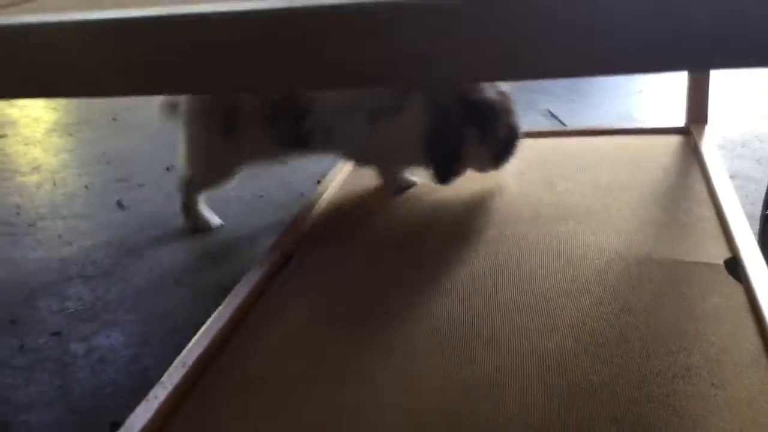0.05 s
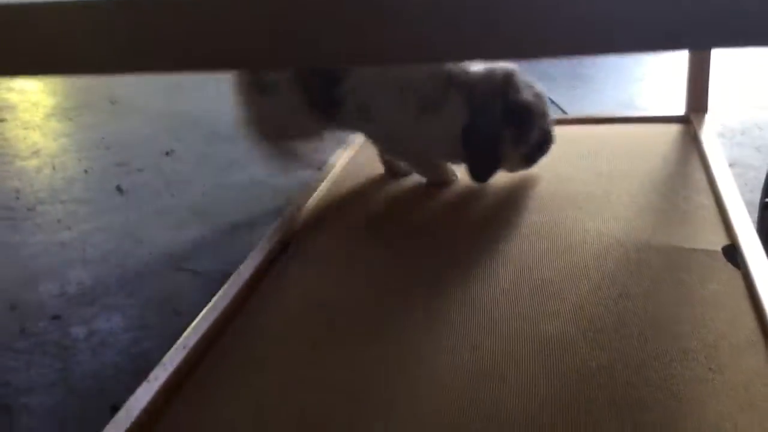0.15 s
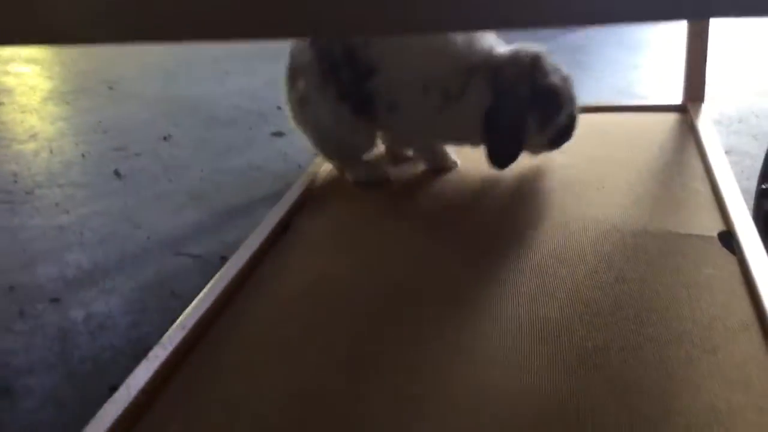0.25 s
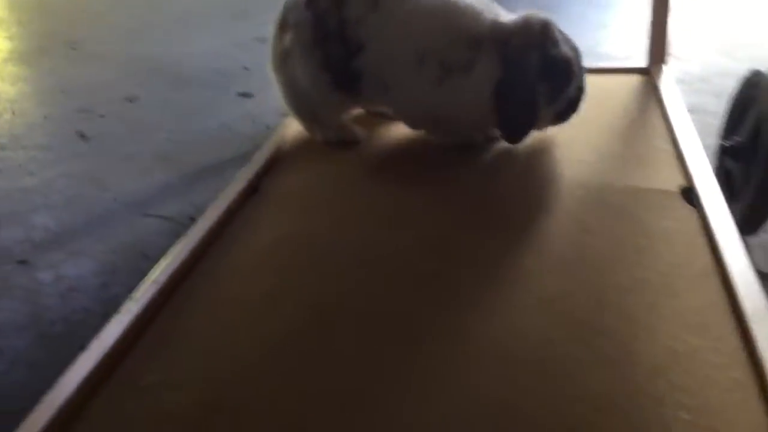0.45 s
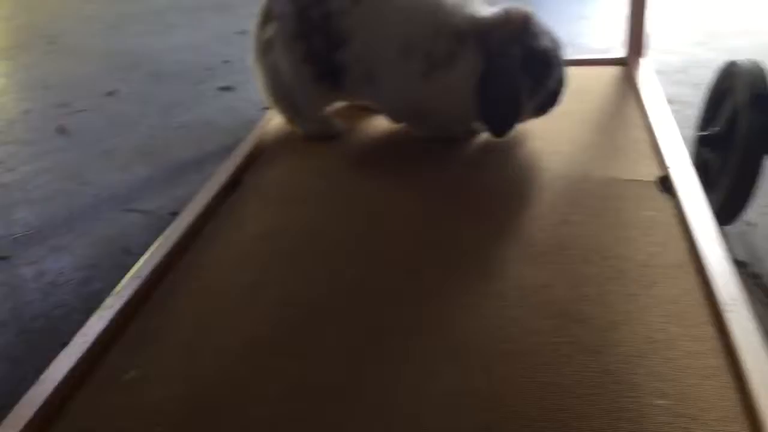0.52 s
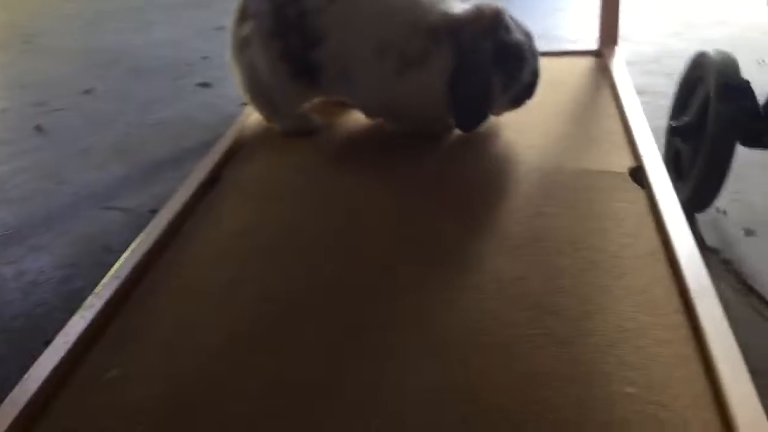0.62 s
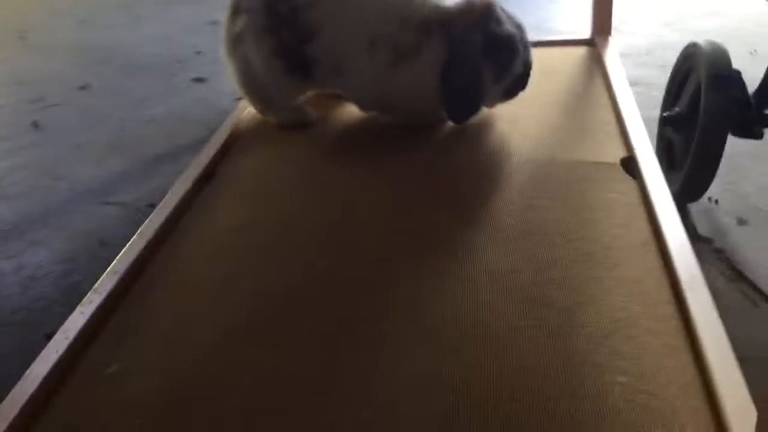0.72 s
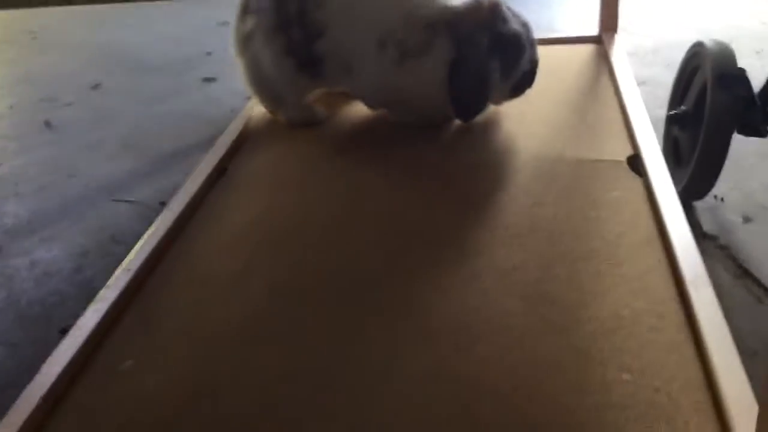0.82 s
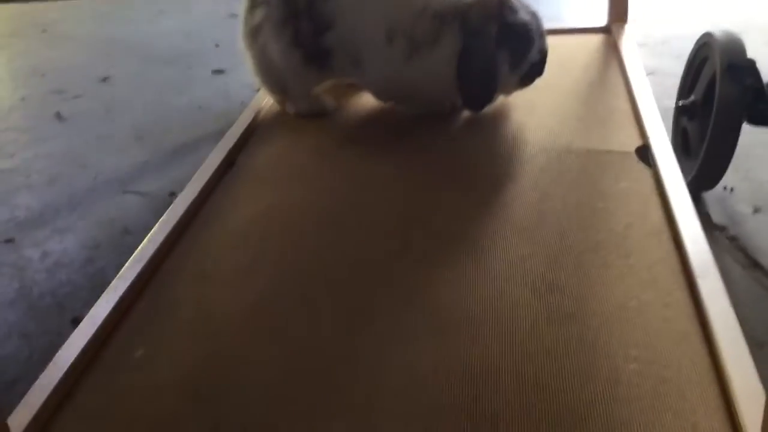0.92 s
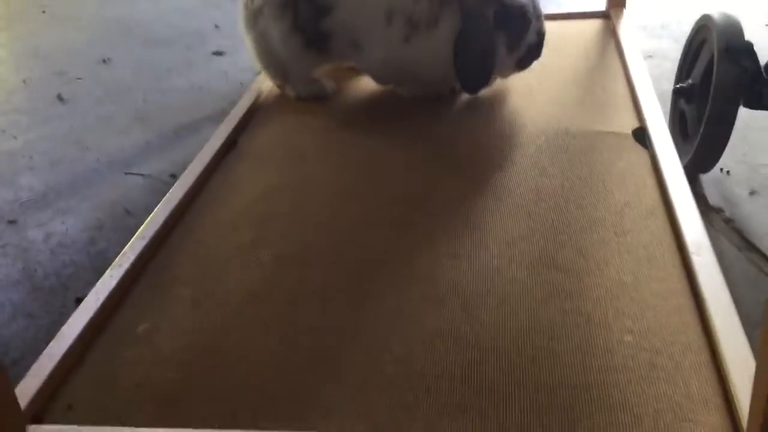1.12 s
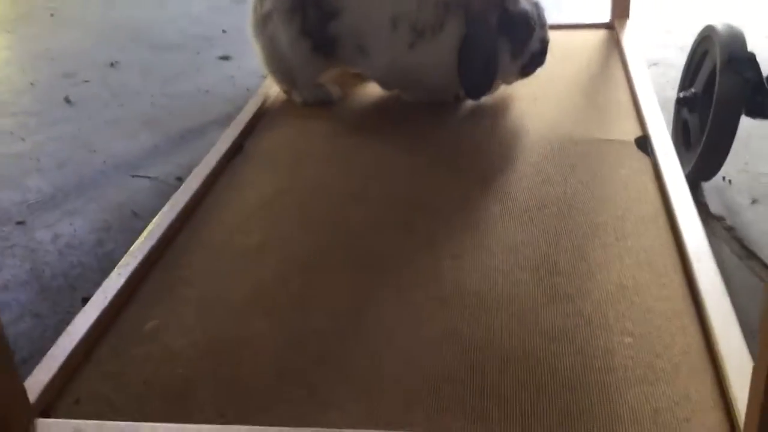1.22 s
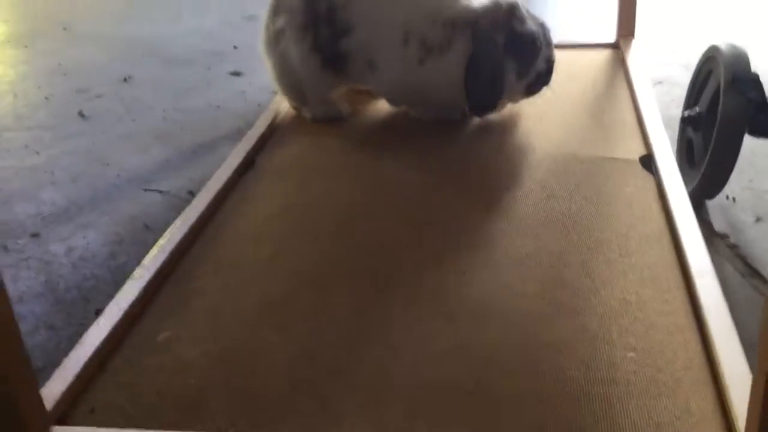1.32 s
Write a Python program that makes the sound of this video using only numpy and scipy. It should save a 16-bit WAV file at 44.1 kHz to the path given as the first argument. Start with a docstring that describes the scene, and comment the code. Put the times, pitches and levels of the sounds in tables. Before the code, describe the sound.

A rabbit hops onto a wooden board. At about 0.2 seconds a paw scuffs with a tiny squeak and lands in a light knock. A louder, hollow knock with crisp claw ticks comes just after 0.3 seconds, followed by softer bumps until 0.5. Faint low thuds and slight rubbing come near 0.7 and 1.2 seconds. The room adds a short echo and a faint rumble and hiss.

```python
"""Rabbit hop on a wooden board

A rabbit hops onto a framed board lying on concrete. One paw scuffs the edge, squeaks and lands, the
next lands hard with a tick of claws, then the body settles in soft thuds. Each footfall rings the
board's modes; a hard-walled room adds a short tail over a faint rumble, hum and hiss."""
import sys
import numpy as np
from scipy import signal
from scipy.fft import rfft, irfft
from scipy.io import wavfile
from scipy.ndimage import uniform_filter1d

SR = 44100
rng = np.random.default_rng(int(sys.argv[2]) if len(sys.argv) > 2 else 0)


def inscribe(sig):
    """Save sig as 16-bit PCM at rate SR to the path in sys.argv[1].

    A 1-D sig is mono; a 2-D sig holds one channel per row.
    Samples are clipped to [-1, 1] before scaling.
    """
    pcm = np.round(np.clip(np.atleast_2d(sig).T, -1, 1) * 32767)
    wavfile.write(sys.argv[1], SR, pcm.astype(np.int16))


N = 59535

# Woody ring of the board: f/Hz, t60/s, level/dB struck at spot 0 (edge), 1 (further in), 2 (haunches)
BOARD_MODES = [(156.5, 0.21, -11, -2.5, 4), (192.1, 0.2, -15.5, -7.5, -18), (202.7, 0.14, 2.9, 2.5, -21),
               (229, 0.38, -12, -12, -10), (277.4, 0.22, -12, -13, -41), (341.2, .15, -11.5, -5, -12),
               (435.4, .1, -31, -18.5, -17), (507, 0.37, -29.5, -21.5, -23.5), (700.6, 0.045, -8, -7, -22),
               (831.5, 0.1, -12, -16, -41), (881, 0.035, -13, -5.5, -25), (1040, 0.12, -36, -22.5, -41),
               (1932, 0.062, -10.5, -22, -45.5), (2255, .05, -22, -18.5, -42)]
# Paw hits: t/s, level/dB, contact/ms, clack/dB, spot
FOOTFALLS = [(.199, -38, 0.19, -55.5, 0), (.243, -52.5, 1.7, -81, 2), (.3130, -31, 0.22, -48, 1),
             (0.3328, -38.5, 1.38, -61, 1), (0.3583, -44, 0.55, -78, 1), (.4483, -40.5, 1.32, -78, 2),
             (0.4884, -43, 3, -83.5, 2)]
# EQ of the clack, the board's dense upper modes: f/Hz, relative level/dB
CLACK_EQ = [(300, -30.5), (520, -8.5), (680, 6), (790, -1.5), (930, 6.5), (1200, -2.5), (1600, -14.5),
            (2300, -3.5), (3300, -8), (5000, -13.5), (8000, -20.5), (15000, -22)]
MUTE_START_S, MUTE_LENGTH_S, MUTE_DB = 0.396, 0.02, -17
def footfalls():
    """Paws knock the board: longer contact sounds duller, and the body's weight mutes the earlier hits."""
    knocks, clack = np.zeros(N), np.zeros(N)
    mute = undb(MUTE_DB * np.minimum(since(MUTE_START_S) / MUTE_LENGTH_S, 1))
    for start, db, contact_ms, clack_db, spot in FOOTFALLS:
        push = np.sin(np.pi * np.minimum(since(0) / (contact_ms / 1000), 1))
        ring = sum(undb(levels[spot]) * board_mode(start, hz, t60) for hz, t60, *levels in BOARD_MODES)
        knock = undb(db) * convolve(ring, push / push.sum())
        knocks += knock * (mute if start < MUTE_START_S else 1)
        clack += undb(clack_db) * burst(start, t60=0.071, tail_db=-6, tail_t60=0.15)
    # the board is too small to radiate deep bass
    return low_cut(knocks + colour(clack, CLACK_EQ), hz=144, order=4)


def board_mode(start, hz, t60):
    """One bending mode: low waves arrive later; it builds up within a cycle and rings out."""
    arrival = start + 0.002 * np.sqrt(200 / hz)  # 2 ms to cross the board at 200 Hz
    cycles = hz * since(arrival)
    attack = 1 - np.exp(-(cycles / 0.41) ** 2)
    return attack * fade(arrival, t60) * np.sin(2 * np.pi * cycles)


# Soft low thuds of the body: t/s, relative level/dB, f/Hz
THUDS = [(0.364, -38, 77.6), (0.671, -49.5, 100.6), (1.15, -51.5, 92)]
THUD_RISE_S, THUD_T60_S = 0.0079, 0.064
def thuds():
    """Shifting weight bends the whole board for a few slow cycles."""
    out = np.zeros(N)
    for start, db, hz in THUDS:
        age = since(start)
        attack = 1 - np.exp(-(age / THUD_RISE_S) ** 2)
        out += 2 * undb(db) * attack * fade(start, THUD_T60_S) * np.sin(2 * np.pi * hz * age)
    return out


# Claw ticks: t/s, level/dB
CLAW_TICKS = [(.0705, -62), (.1857, -47), (.1874, -39), (.196, -49), (.313, -40), (.3302, -43),
              (.3312, -46)]
# Bright EQ of the ticks: f/Hz, relative level/dB
CLAW_EQ = [(1000, -25), (3000, -7), (5000, -3.5), (8500, -5.5), (13000, 2.5), (14500, 0.5), (15500, 2.5)]
def claws():
    """Hard claw tips strike the wood in tiny, crisp ticks."""
    ticks = sum(undb(db) * burst(start, t60=0.004, tail_db=-20, tail_t60=0.065)
                for start, db in CLAW_TICKS)
    return colour(ticks, CLAW_EQ)


# Slides of paw and fur: start/s, peak/s, end/s, level/dB
SCUFFS = [(0.16, 0.1878, 0.24, -52.5), (0.071, 0.08, 0.13, -74), (0.25, 0.615, 0.87, -78.5),
          (1.1, 1.175, 1.6, -79)]
# Mid-heavy EQ of the rubbing: f/Hz, relative level/dB
SCUFF_EQ = [(300, 3), (800, 20), (1400, 17), (2000, 7.5), (3500, 4.5), (6000, 4), (8000, 5), (12500, 2),
            (15500, 1.5)]
# Thin ring of the rubbed frame: f/Hz, width/Hz, level/dB against the rub
FRAME_MODES = [(1600, 50, -10), (2920, 55, -8), (3610, 50, -11), (4090, 80, -11), (5520, 90, -16),
               (5860, 110, -14)]
GRAINS_PER_S, GRAIN_SCATTER_DB = 6900, 3.5
def scuffs():
    """Dense friction grains swell and die away as a paw slides, ringing the frame."""
    grains = (rng.random(N) < GRAINS_PER_S / SR) * rng.choice([-1, 1], N)
    grains = grains * undb(GRAIN_SCATTER_DB * rng.standard_normal(N))
    pressure = sum(undb(db) * np.interp(since(0), [start, peak, end], [0, 1, 0]) ** 2
                   for start, peak, end, db in SCUFFS)
    rub = pressure * unit(grains)
    frame = sum(undb(db) * resonance(rub, hz, width) for hz, width, db in FRAME_MODES)
    return colour(rub, SCUFF_EQ) + np.std(rub) * frame


# Squeaks, a paw pad and then a scraping claw: t/s, length/s, level/dB, first f/Hz, last f/Hz
SQUEAKS = [(0.17, 0.033, -51.5, 775.3, 680), (0.196, 0.0068, -42, 2250, 1656)]
SQUEAK_JITTER = 0.0917  # rms, as a fraction of the pitch
def squeaks():
    """A sliding paw pad, then a scraping claw, sticks and slips at a rough, falling pitch."""
    out = np.zeros(N)
    for start, length, db, first_hz, last_hz in SQUEAKS:
        progress = np.minimum(since(start) / length, 1)
        jitter = SQUEAK_JITTER * unit(uniform_filter1d(rng.standard_normal(N), size=60))
        hz = (first_hz + (last_hz - first_hz) * progress) * (1 + jitter)
        out += undb(db) * np.sin(np.pi * progress) * np.sin(2 * np.pi * np.cumsum(hz) / SR)
    return out


# EQ of the reverb tail: f/Hz, relative level/dB
ROOM_EQ = [(400, 1), (1000, -5), (4000, 2.5), (15000, -1)]
ROOM_T60_S, ROOM_DB, PREDELAY_S = 0.78, -13.5, 0.008
def room(x):
    """Diffuse tail from the concrete and the walls; the bass stays dry."""
    tail = colour(rng.standard_normal(N) * fade(PREDELAY_S, ROOM_T60_S), ROOM_EQ)
    send = low_cut(x, hz=400, order=2)
    return undb(ROOM_DB) * convolve(send, tail / np.linalg.norm(tail))


# Room tone, rumble up to hiss: f/Hz, relative level/dB
AIR_EQ = [(15, -63), (25, -22), (96, -1.5), (178, -9.5), (240, -9), (313, -16.5), (368, -14.5), (509, -24),
          (703, -19.5), (895, -27.5), (1200, -27.5), (2630, -32.5), (4150, -33), (11500, -41), (15500, -42)]
# Low hum of the room's resonances: f/Hz, width/Hz, level/dB
HUM_BANDS = [(115.6, 4.7, -77.5), (240.7, 6, -76.5)]
AIR_DB, AIR_WAVER_DB = -66, 1
def background():
    """A faint bed of wavering rumble and hiss, with two humming room resonances."""
    waver = np.interp(np.arange(N), np.linspace(0, N, 12), rng.standard_normal(12))
    bed = undb(AIR_DB + AIR_WAVER_DB * waver) * unit(colour(rng.standard_normal(N), AIR_EQ))
    bin_hz = np.arange(N // 2 + 1) * SR / N
    for hz, width, db in HUM_BANDS:
        band = rfft(rng.standard_normal(N)) / (1 + (2 * (bin_hz - hz) / width) ** 2)
        bed += undb(db) * unit(irfft(band, N))
    return bed


def undb(db):
    """Decibels to gain."""
    return 10 ** (np.asarray(db) / 20)


def unit(x):
    """Scale to rms 1."""
    return x / np.sqrt(np.mean(x ** 2))


def since(start):
    """Seconds since start, zero before it."""
    return np.maximum(np.arange(N) / SR - start, 0)


def fade(start, t60):
    """Exponential decay from start, 60 dB down after t60 seconds."""
    age = since(start)
    return (age > 0) * np.exp(-np.log(1000) * age / t60)


def burst(start, t60, tail_db, tail_t60):
    """Dense ringing as noise: a quick crack and a weaker, longer tail."""
    return rng.standard_normal(N) * (fade(start, t60) + undb(tail_db) * fade(start, tail_t60))


def convolve(x, response):
    """Pass a sound through an impulse response."""
    return signal.fftconvolve(x, response)[:N]


def colour(x, points, size=8192):
    """Minimum-phase EQ through (f/Hz, level/dB) points that keeps the power of white noise."""
    hz, db = np.array(points, float).T
    bin_hz = np.maximum(np.arange(size // 2 + 1) * SR / size, 1)
    gain = undb(np.interp(np.log(bin_hz), np.log(hz), db))
    cepstrum = irfft(np.log(gain))
    cepstrum[1:size // 2] *= 2  # folded forward, so nothing rings ahead of a hit
    cepstrum[size // 2 + 1:] = 0
    response = irfft(np.exp(rfft(cepstrum)))
    return convolve(x, response / np.linalg.norm(response))


def resonance(x, hz, width):
    """One resonant peak, scaled to rms 1."""
    return unit(signal.lfilter(*signal.iirpeak(hz, hz / width, fs=SR), x))


def low_cut(x, hz, order):
    """Roll off the bass below hz."""
    return signal.sosfilt(signal.butter(order, hz, "high", fs=SR, output="sos"), x)


def scene():
    """The hop, its room tail and the background, in mono."""
    hop = footfalls() + thuds() + claws() + scuffs() + squeaks()
    return (hop + room(hop) + background())[None]


def record(dry):
    """Master EQ: drop the deepest bass and cut steeply above 15550 Hz."""
    high_cut = signal.ellip(10, 0.1, 70, 15550, fs=SR, output="sos")
    return signal.sosfilt(high_cut, low_cut(dry, hz=42, order=3))


dry = scene()
out = record(dry)
inscribe(out)
```